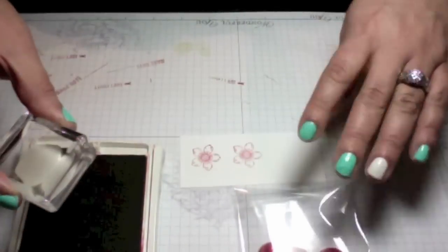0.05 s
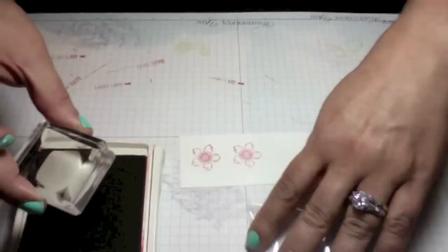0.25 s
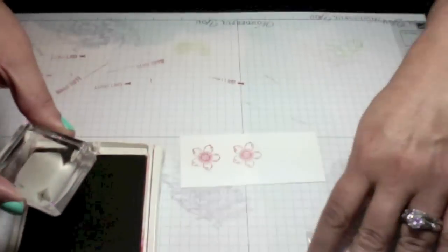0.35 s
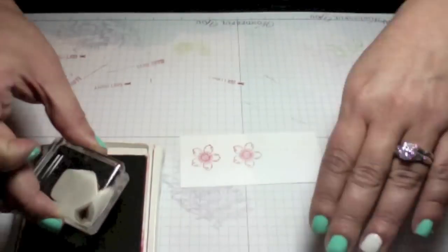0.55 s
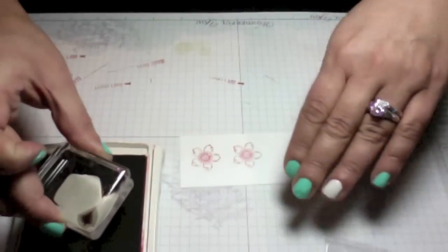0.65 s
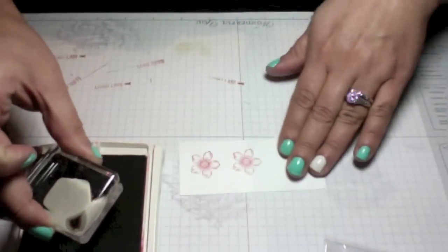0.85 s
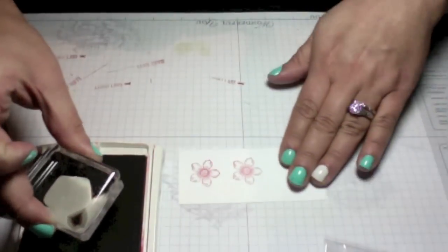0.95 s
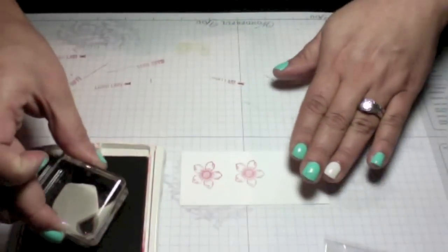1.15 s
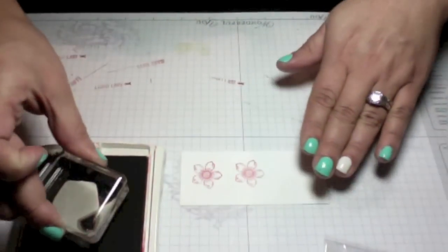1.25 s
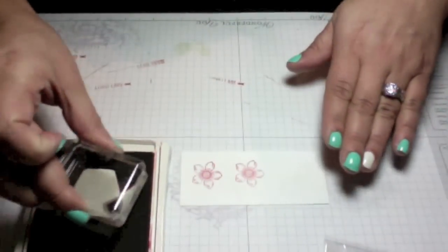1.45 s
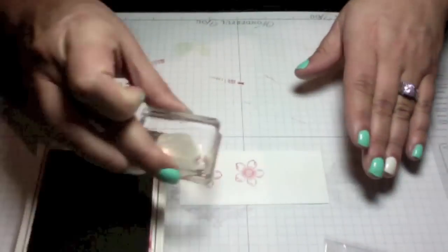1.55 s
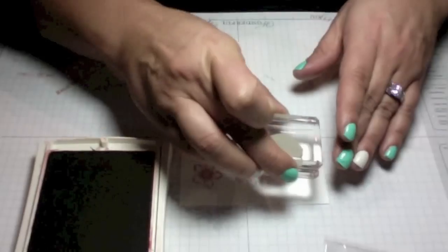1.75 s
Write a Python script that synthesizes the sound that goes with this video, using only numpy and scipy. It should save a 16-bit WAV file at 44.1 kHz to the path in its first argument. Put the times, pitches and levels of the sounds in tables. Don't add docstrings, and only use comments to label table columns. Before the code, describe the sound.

Stiff plastic crackles loudly and sweeps off paper, followed by two desk taps and a sharp click

```python
import sys
import numpy as np
from scipy import signal
from scipy.io import wavfile

SR = 44100
rng = np.random.default_rng(int(sys.argv[2]) if len(sys.argv) > 2 else 0)


def file_out(sig):
    cols = np.atleast_2d(sig).T
    lim = np.clip(cols, -1, 1)
    pcm = np.round(lim * 32767).astype(np.int16)
    wavfile.write(sys.argv[1], SR, pcm)


def nominal_scale(level):
    x = np.asarray(level, float) / 20
    return 10 ** x


N = 79380


def rms_one(x):
    return x / np.sqrt(np.mean(x ** 2) + 1e-20)


def at_hz(points, hz):
    points = np.array(points)
    return np.interp(np.log(hz), np.log(points[:, 0]), points[:, 1])


def level(rows):
    s, db = np.transpose(rows)
    return nominal_scale(np.interp(np.arange(N) / SR, s, db, left=-150, right=-150))


def drift(hz):
    r = np.exp(-2 * np.pi * hz / SR)
    warm_up = 4000
    slow = signal.lfilter([1], [1, -2 * r, r * r], rng.standard_normal(N + warm_up))
    return rms_one(slow[warm_up:])


def ring(x, hz, t60):
    r, w = nominal_scale(-60 / (t60 * SR)), 2 * np.pi * hz / SR
    return signal.lfilter([0, np.sin(w)], [1, -2 * r * np.cos(w), r * r], x + 1e-18)


def highpass(x, hz, order=2):
    return signal.sosfilt(signal.butter(order, hz, "high", fs=SR, output="sos"), x)


EDGES = 40 * 2 ** np.arange(0, 8.8, 1 / 3)


def bands(x):
    for k, (low, high) in enumerate(zip(EDGES, EDGES[1:])):
        band = signal.butter(2, [low, high], "band", fs=SR, output="sos")
        yield np.sqrt(low * high), signal.sosfilt(band, x[k % 2])


def friction(colour, grain_db, patchy_db, patch_hz):
    grains = rng.standard_normal((2, N)) * nominal_scale(grain_db * np.minimum(rng.exponential(1, N), 5))
    lowest_hz = colour[0][0]
    out = np.zeros(N)
    for hz, band in bands(grains):
        if hz > lowest_hz:
            out += band * nominal_scale(at_hz(colour, hz) + patchy_db * drift(patch_hz))
    return rms_one(out)


def strike(events, modes, thin_hz, soft_hz, signs=1, spread_db=2):
    s, db = np.transpose(events)
    chance = spread_db * rng.standard_normal((len(s), len(modes)))
    out = np.zeros(N)
    for k, (hz, mode_db, t60) in enumerate(modes):
        clicks = np.zeros(N)
        heights = signs * (-1) ** k * nominal_scale(db + mode_db + chance[:, k])
        np.add.at(clicks, (s * SR).astype(int), heights)
        out += ring(clicks, hz, t60)
    out = highpass(out, thin_hz)
    return signal.sosfilt(signal.butter(4, min(soft_hz, 19000), fs=SR, output="sos"), out)


def blurred(modes):
    return [(hz, db, 0.3 * t60) for hz, db, t60 in modes]


# f/Hz, t60/s
ROOM_DECAY = [(100, .35), (300, 0.3), (1000, 0.25), (4000, .28), (7000, 0.2), (12000, 0.092)]


def room(x):
    gap_s = 0.0044
    t = np.arange(SR // 2) / SR
    tail = np.zeros(len(t))
    for hz, band in bands(rng.standard_normal((2, len(t)))):
        tail += band * nominal_scale(-60 * t / at_hz(ROOM_DECAY, hz))
    tail = tail * np.clip(t / gap_s - 1, 0, 1)
    return signal.fftconvolve(x, tail / np.sqrt(np.sum(tail ** 2)))[:N]


# f/Hz, level/dB (per Hz)
HUSH_COLOUR = [(35, -35), (90, -5), (290, -5), (900, -6), (2300, -13), (3200, -11), (5000, -22.5),
               (11000, -33.5), (16000, -51)]


def hush():
    return nominal_scale(-58) * friction(HUSH_COLOUR, grain_db=.3, patchy_db=.6, patch_hz=15)


# t/s, level/dB
STIR_LEVEL = [(.55, -78), (.66, -66), (.78, -70), (.8, -85), (1.172, -85), (1.186, -64), (1.205, -85),
              (1.378, -85), (1.395, -57), (1.415, -68), (1.45, -85), (1.68, -82), (1.76, -70), (1.8, -70)]
# f/Hz, level/dB (per Hz)
STIR_TONE = [(1500, -16), (3000, -9), (4500, -3.5), (7000, -1.5), (10000, -18), (14000, -47)]


def stir():
    return level(STIR_LEVEL) * friction(STIR_TONE, grain_db=2.5, patchy_db=1.5, patch_hz=30)


# t/s, level/dB, f/Hz, length/s
SQUEAK_EVENTS = [
    (0.564, -46, 4350, 0.002),
    (1.456, -40, 4300, 0.0018),
]


def squeaks():
    t = np.arange(N) / SR
    out = np.zeros(N)
    for s, db, hz, length in SQUEAK_EVENTS:
        out += nominal_scale(db) * np.exp(-((t - s) / length) ** 2) * np.sin(2 * np.pi * hz * t)
    return out


TICK_TIMES = [.801, .807, .8086, .809, .814, 1.615, 1.792, .4466, .4466, .447]
# level/dB, f/Hz, t60/s
TICK_TONES = [
    (-51, 7120, .003),
    (-38, 4800, .005),
    (-46, 10500, .01),
    (-37, 7800, .006),
    (-34, 8150, .0065),
    (-40.5, 4500, .0068),
    (-44.5, 4550, 0.0041),
    (-10.5, 3880, 0.013),
    (-29.5, 420, 0.038),
    (-36.5, 215, 0.04),
]
KNOCK_RING_TIMES = [.2178, .2178, .2178, .2318, .2385, .2392, .2698, .2935, .2935, .2938, .4466, .4466]
# level/dB, f/Hz, t60/s
KNOCK_RING_TONES = [(-31, 880, .012), (-30, 3100, .01), (-33, 5700, .008), (-8, 5750, .01), (-8, 950, .012),
                    (-7, 1950, .01), (-8, 2000, .008), (-10, 1250, .011), (-11, 3250, .008),
                    (-10, 4450, .013), (-19, 3200, .012), (-22, 6900, .007)]


def small_rings():
    out = np.zeros(N)
    for s, (db, hz, t60) in zip(TICK_TIMES + KNOCK_RING_TIMES, TICK_TONES + KNOCK_RING_TONES):
        out += strike([(s, db)], [(hz, 0, t60)], thin_hz=.7 * hz, soft_hz=1.25 * hz)
    return out


# t/s, level/dB
NAIL_ON_CARD = [
    (.7478, -42),
    (.7488, -30),
]
# f/Hz, level/dB, t60/s
CARD_MODES = [(1335, -2.5, .018), (1660, -11, 0.029), (1850, -19, .02), (2350, 3, 0.017),
              (2590, 0.5, 0.016), (3220, -9.5, 0.018), (3670, -8.5, 0.011), (4520, -16, 0.019),
              (4950, -20.5, 0.015), (5930, -23, 0.0092)]


def nail_tick():
    return strike(NAIL_ON_CARD, CARD_MODES, thin_hz=800, soft_hz=9000, spread_db=1)


# t/s, level/dB
SLIDE_LEVEL = [
    (0.795, -84),
    (0.799, -70),
    (0.811, -49),
    (0.819, -53.5),
    (0.905, -43.5),
    (0.957, -50.5),
    (1.011, -49),
    (1.07, -75.5),
]
# f/Hz, level/dB (per Hz)
SLIDE_TONE = [(1290, -57), (2200, -41), (3090, 3.5), (3470, -10), (3970, 22.5), (4800, -4.5), (6420, 10),
              (7970, 1.5), (16000, -69)]
# f/Hz, width/Hz, level/dB
CARD_TONES = [(4050, 120, -13), (5300, 250, -22), (6500, 300, -17), (7800, 300, -20), (9900, 250, -14),
              (10900, 250, -16)]


def slide():
    rub = friction(SLIDE_TONE, grain_db=-1.5, patchy_db=2.0, patch_hz=24.7)
    sung = np.zeros(N)
    for hz, width, db in CARD_TONES:
        sung += nominal_scale(db) * ring(rub, hz, 2.2 / width) * np.sqrt(width / 4000)
    return level(SLIDE_LEVEL) * rms_one(rub + sung)


# t/s, level/dB
PEEL_LEVEL = [
    (1.455, -65),
    (1.485, -52),
    (1.50, -53),
    (1.515, -39.5),
    (1.59, -57),
    (1.625, -59.5),
    (1.65, -89.5),
]
# f/Hz, level/dB (per Hz)
PEEL_TONE = [(2200, -37), (3400, 12), (4600, 11.5), (5800, 0), (7000, -24), (8700, 2), (11000, -23),
             (15000, -40)]


def peel():
    return level(PEEL_LEVEL) * friction(PEEL_TONE, grain_db=3.5, patchy_db=1.5, patch_hz=30)


# t/s, level/dB
SNAP_CLICKS = [
    (1.50265, -10),
    (1.50306, -11),
    (1.5066, -28),
]
# f/Hz, level/dB, t60/s
BLOCK_MODES = [(2140, -32, .008), (2970, -9, 0.0075), (3340, -3, 0.0059), (4310, -1, 0.01),
               (4830, -3.5, 0.013), (5430, 1, 0.0087), (7110, -4.5, .007), (8250, -9, 0.0064),
               (8750, -12, 0.011), (9570, -17, 0.0056), (11200, -30, .005), (12500, -26, 0.0033),
               (14700, -33, .003), (15600, -28.5, .003)]


def snap():
    near = strike(SNAP_CLICKS, BLOCK_MODES, thin_hz=2400, soft_hz=17000, spread_db=5.5)
    far = strike(SNAP_CLICKS[:1], blurred(BLOCK_MODES), thin_hz=3600, soft_hz=10000, spread_db=-3.5)
    return near, far


# t/s, level/dB
PAD_HITS = [
    (1.1693, -15.5),
    (1.374, -19.5),
]
# t/s, level/dB
NAIL_HITS = [
    (1.1721, -11),
    (1.3770, -10),
]
# t/s after landing, level/dB
TOUCHES = [
    (0, 0.5),
    (.0011, -7.5),
    (.0029, -5.5),
]
NAIL_BOOM = [-6, -10.5]
# f/Hz, level/dB, t60/s
DESK_LOW_MODES = [(116.5, 1, 0.15), (148.5, -5, 0.088), (193.4, -2, 0.13), (256.2, 1, 0.081),
                  (295, -7, 0.064), (323.7, -4, 0.078), (432, -9, 0.11), (702, 1, 0.014), (812, -6, 0.0071)]
# f/Hz, level/dB, t60/s
DESK_HIGH_MODES = [(1082, -3, 0.012), (1377, -4.5, 0.013), (1525, -5.5, 0.015), (2110, -3.5, 0.0097),
                   (2273, -2.5, 0.01), (2657, -2, 0.0083), (3380, -5.5, 0.012), (3680, -10, .014),
                   (4200, -16.5, 0.011), (4420, -23, 0.026), (4990, -19.5, .008)]
# f/Hz, level/dB, t60/s
SKIN_MODES = [(915, 2, 0.016), (1116, -1, 0.0046)]


def taps():
    pad_boom_db, echo_s, echo_db = -6, 0.023, -24
    nails = [(s + after, db + loss) for s, db in NAIL_HITS for after, loss in TOUCHES]
    boom_hits = [(s, db + pad_boom_db) for s, db in PAD_HITS]
    for (s, db), share in zip(nails, np.repeat(NAIL_BOOM, len(TOUCHES))):
        boom_hits.append((s, db + share))
    slap = strike(PAD_HITS, SKIN_MODES, thin_hz=500, soft_hz=2500, spread_db=1)
    clack = strike(nails, DESK_HIGH_MODES, thin_hz=710, soft_hz=5750, spread_db=3.0)
    boom = strike(boom_hits, DESK_LOW_MODES, thin_hz=61.0, soft_hz=1510, spread_db=2)
    echo = nominal_scale(echo_db) * np.roll(clack, int(echo_s * SR))
    far_clack = strike(NAIL_HITS, blurred(DESK_HIGH_MODES), thin_hz=506, soft_hz=4600, spread_db=3.5)
    return boom + slap, clack + echo, far_clack


SING_TIMES = [.283, .32, .322, .333, .34, .35, .365, .378, .41, .418, .42]
# half length/s, f/Hz, width/Hz, level/dB
SING_TONES = [(.012, 2700, 800, -27.5), (.01, 6000, 500, -26.5), (.008, 4600, 800, -27),
              (0.017, 3700, 420, -29), (0.013, 6600, 950, -28.5), (.018, 4600, 300, -30),
              (.03, 1200, 600, -35.5), (0.011, 2470, 510, -32.5), (0.012, 1970, 1400, -30),
              (0.01, 3200, 400, -32), (.012, 4900, 960, -37)]


def sings():
    t = np.arange(N) / SR
    rub = np.diff(rng.standard_normal(N + 1))
    out = np.zeros(N)
    for s, (half, hz, width, db) in zip(SING_TIMES, SING_TONES):
        t60 = 2.2 / width
        narrow = rms_one(ring(ring(rub, hz, t60), hz, t60))
        out += nominal_scale(db) * np.exp(-((t - s) / half) ** 2) * narrow
    return out


# t/s, level/dB
SWEEP_LEVEL = [
    (.2175, -50.5),
    (.229, -37),
    (.24, -15.5),
    (.29, -24),
    (.35, -25),
    (.39, -31.5),
    (.42, -28),
    (.44, -38.5),
    (.49, -48.5),
]
# f/Hz, level/dB (per Hz)
SWEEP_TONE = [(71, -59), (120, -26), (334, -14.5), (600, -15.5), (1240, -13.5), (1400, -9.5), (4590, -4.5),
              (9990, -16), (16000, -47.5)]


def drag():
    scrape = friction(SWEEP_TONE, grain_db=3.3, patchy_db=3.2, patch_hz=45)
    return level(SWEEP_LEVEL) * scrape + sings()


KNOCK_TIMES = [.2178, .2298, .2318, .2385, .2492, .2538, .2697, .2935, .381, .4465, .4715]
# level/dB, chatter length/s, hardness f/Hz
KNOCK_HITS = [(-32, .0015, 7000), (-13, 0.0002, 9000), (7, 0.0031, 18000), (-4, 0.0025, 6400),
              (6.5, .0037, 15000), (-13.5, 0.0021, 5000), (-1.5, 0.0013, 6500), (-8.5, 0.0006, 9100),
              (-25, 0.0025, 12000), (-13, .004, 8000), (-28.5, .001, 7200)]
# f/Hz, level/dB, t60/s
SLEEVE_MODES = [(334, -31.5, .02), (898, -9, .012), (1460, -10, .01), (1977, -10.5, 0.02),
                (2542, -1, 0.0089), (3057, -2.5, 0.01), (3890, -3.5, 0.0079), (4900, -3, .007),
                (5770, -3.5, 0.012), (6485, -4.5, .006), (7920, -5, 0.0096), (9550, -7.5, 0.0035),
                (12000, -14, .004), (14500, -13.5, .003)]


def sleeve():
    chatter_loss_db = 5
    out = np.zeros(N)
    for s, (db, length, hard_hz) in zip(KNOCK_TIMES, KNOCK_HITS):
        when, sign = rng.random(8), rng.choice([-1, 1], 8)
        contacts = []
        for k in range(8):
            late = when[k] * (k > 0)
            contacts.append((s + length * (k + late) / 8, db - 10 - chatter_loss_db * k / 8))
        out += strike(contacts, SLEEVE_MODES, thin_hz=650, soft_hz=hard_hz, signs=sign)
    return out


def scene():
    bag, scrape = sleeve(), drag()
    desk, clack, far_clack = taps()
    block, far_snap = snap()
    to_room = nominal_scale(-18.5) * bag + nominal_scale(-15.5) * desk + nominal_scale(-2) * far_clack
    to_room = to_room + nominal_scale(-10.5) * far_snap + nominal_scale(-8.5) * scrape
    small = squeaks() + small_rings() + nail_tick()
    quiet = hush() + stir() + slide() + peel()
    return (bag + scrape + desk + clack + block + small + quiet + room(to_room))[None]


def band_limit(x):
    return signal.sosfilt(signal.butter(12, 16270, fs=SR, output="sos"), x)


def record(dry):
    x = np.clip(highpass(dry, 92, order=3), -1, 1)
    x = signal.sosfilt(signal.cheby2(10, 40, 16600, fs=SR, output="sos"), x)
    return band_limit(np.clip(x, -1, 1))


dry = scene()
out = record(dry)
file_out(out)
```